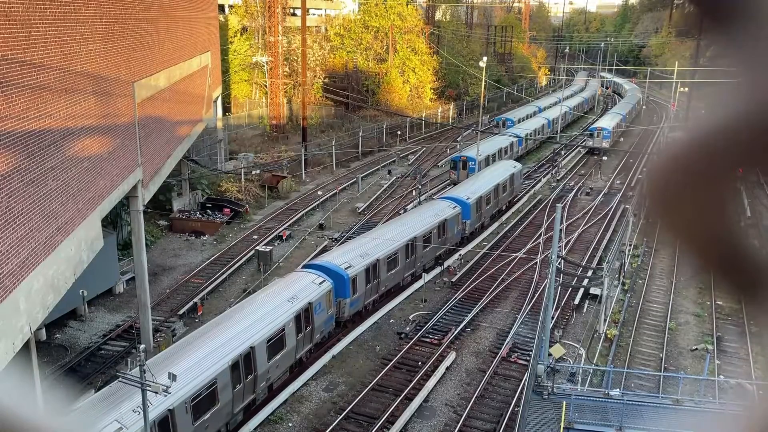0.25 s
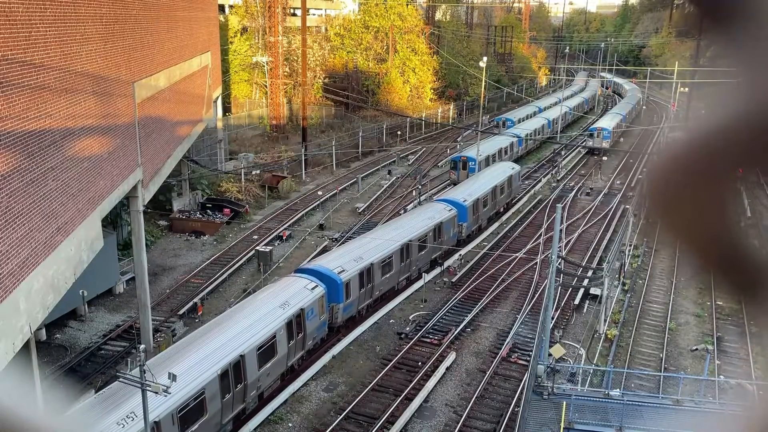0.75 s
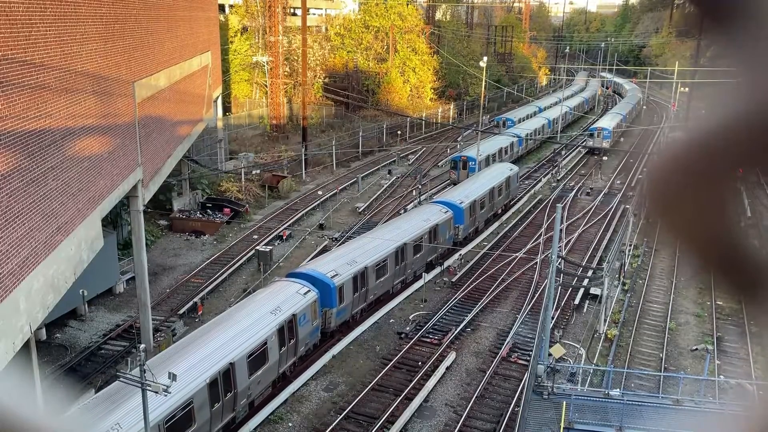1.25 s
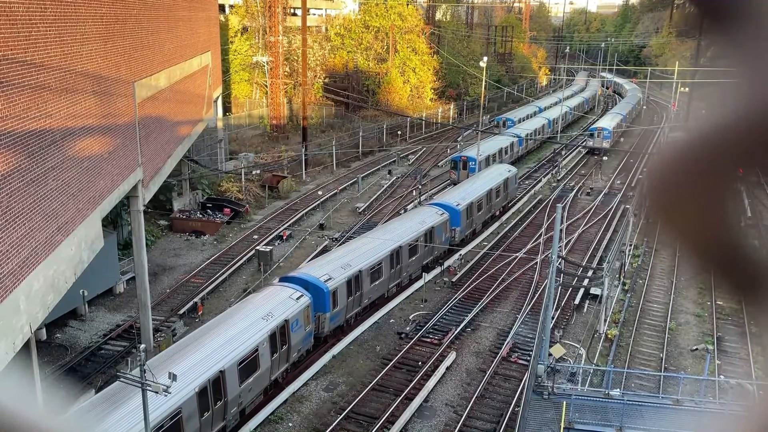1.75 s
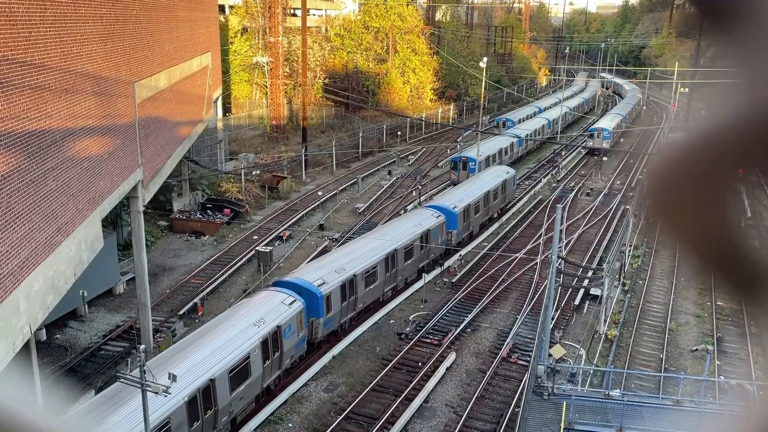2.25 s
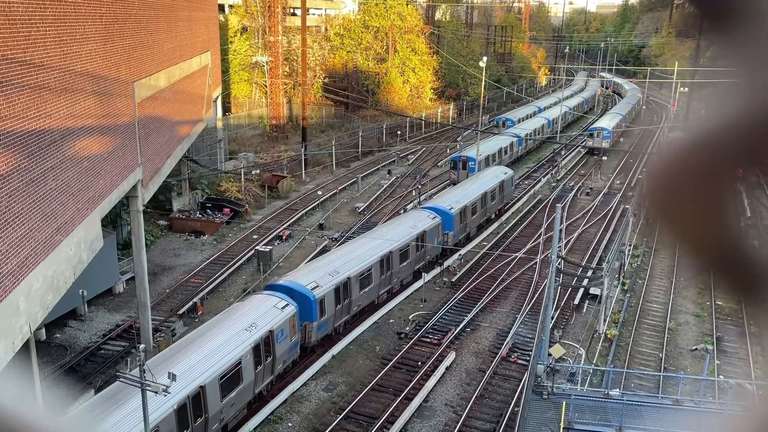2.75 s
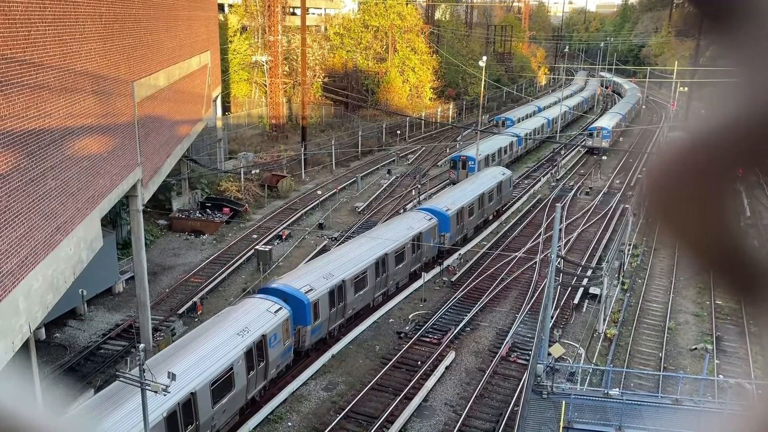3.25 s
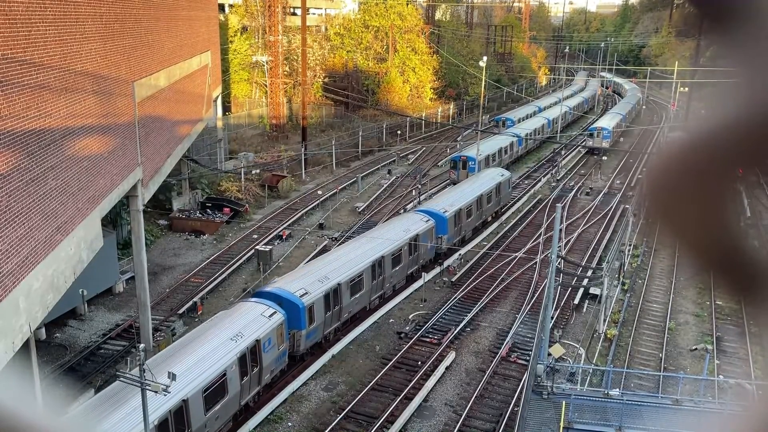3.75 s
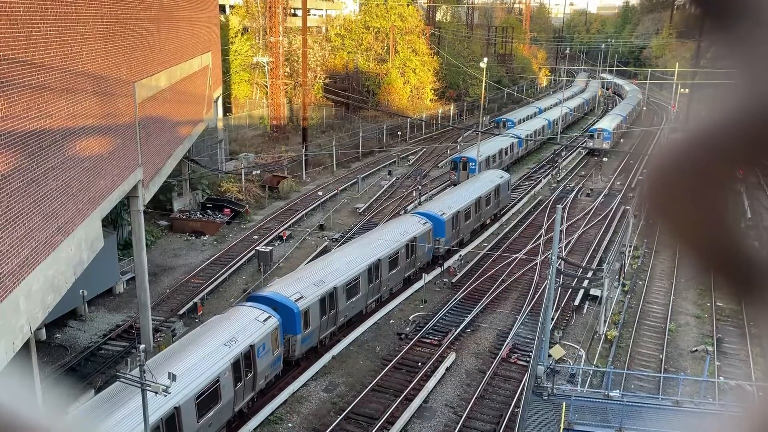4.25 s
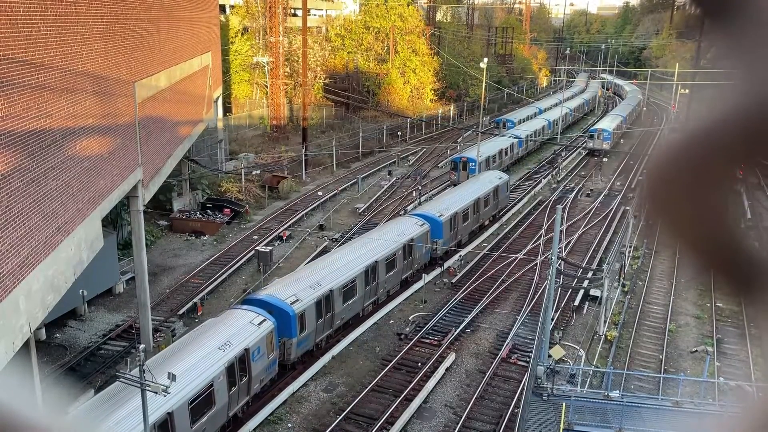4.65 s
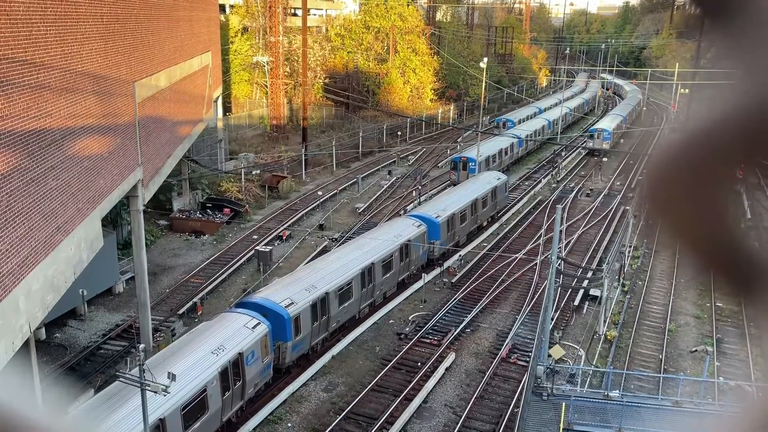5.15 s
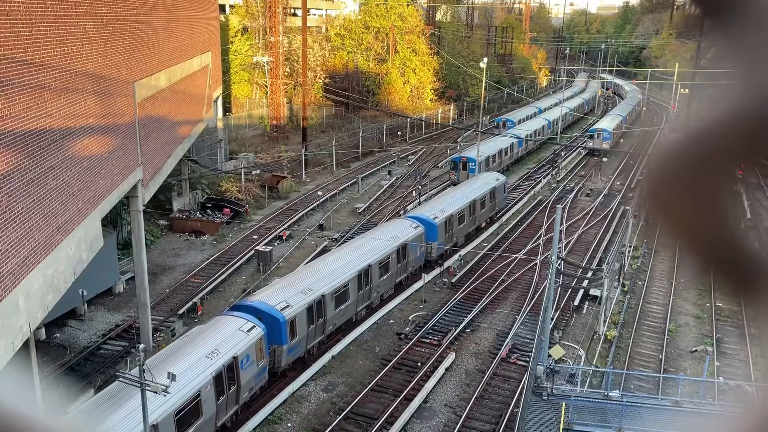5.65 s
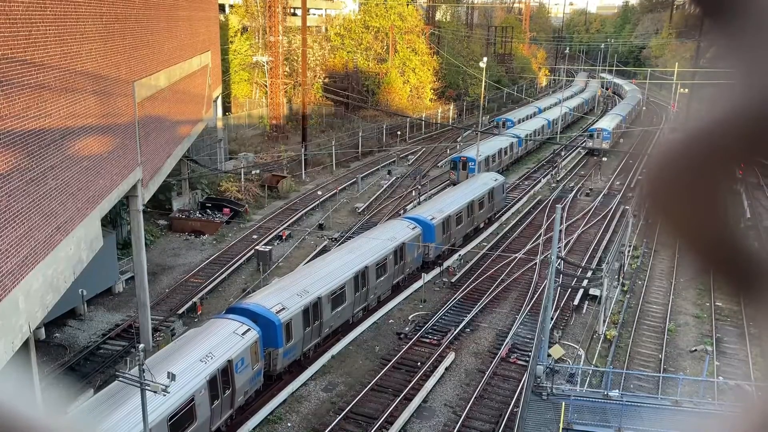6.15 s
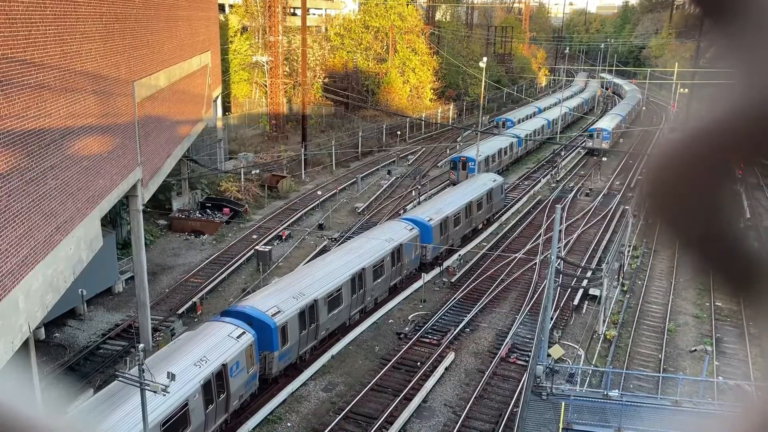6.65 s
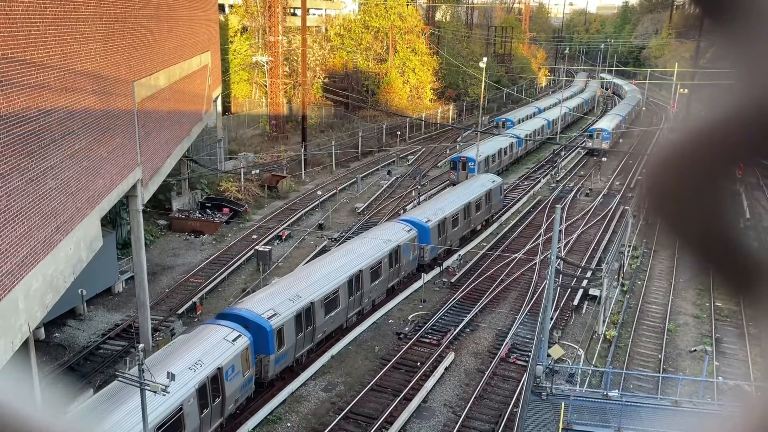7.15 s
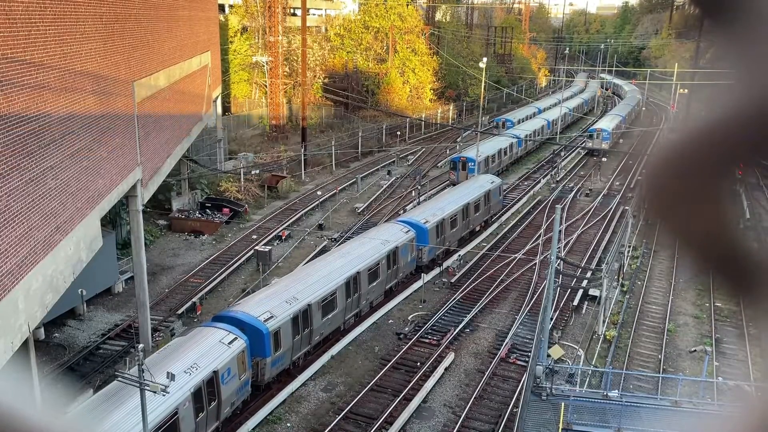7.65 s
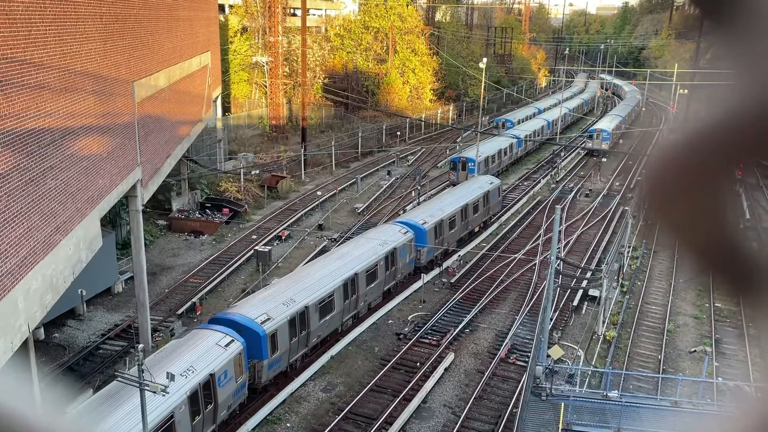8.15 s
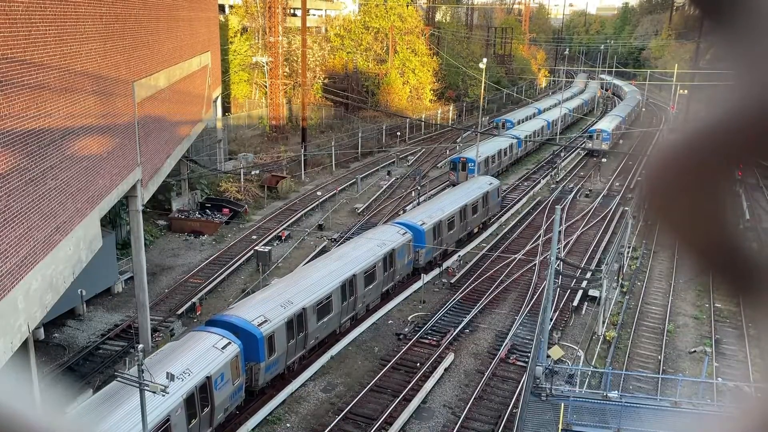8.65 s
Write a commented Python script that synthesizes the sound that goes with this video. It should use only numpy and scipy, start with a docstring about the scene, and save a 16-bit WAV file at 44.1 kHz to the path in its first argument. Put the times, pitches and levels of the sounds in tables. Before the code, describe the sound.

A long metro train creeps through an open rail yard, heard in wide stereo from a bridge above. From 0 to 0.6 s heavy low booms and lurches tumble together, with a hard dull thud near 0.65 s and a faint, very high squeal fading before 0.9 s. From 0.8 to 1.6 s lighter wheel thuds tick over gaps under hiss; a clear squeak chirps at about 1.6 s. Around 2 to 2.7 s there are sparse lurches and knocks while the hiss thins. From 3.2 to 4 s comes the second burst: clatter, low booms, a short frame drone, rougher rolling roar. After that, scattered soft low lurches until 6.2 s, over steady deep rumble and faint long ringing. From 6.2 s thin chirps multiply, brightest near 7.7 s, and hiss and rumble continue to the cut at about 8.9 s.

```python
"""Train creeping through a rail yard

A slow train is heard from a bridge above. The car bodies boom and lurch, shaped from deep noise and short low swings.
The bogies (wheel frames) clatter, drone and thud over switch gaps; the treads (running surfaces) roar dully.
The flanges (wheel lips) rub on the curve: noise hisses and grinds, narrow resonances ring, wavering sines squeal.
Two microphone ports hear bass and treble arrive from different sides.
"""
import sys
import numpy as np
from scipy import signal
from scipy.fft import rfft, irfft
from scipy.io import wavfile

SR = 44100
rng = np.random.default_rng(int(sys.argv[2]) if len(sys.argv) > 2 else 0)


def to_wav(sig):
    """Store sig (one row per channel, or 1-D mono) as 16-bit WAV at the path in sys.argv[1].

    Samples outside -1..1 are clipped; the rate is SR.
    """
    pcm = np.clip(np.atleast_2d(sig), -1, 1) * 32767
    pcm = np.round(pcm).astype(np.int16)
    wavfile.write(sys.argv[1], SR, pcm.T)  # frames by channels


N = 391608

# car bodies and bogies on the track: (time [s], rumble level [dB], clatter level [dB])
CAR_LEVELS = [(0.0, -18, -26.5), (0.2, -30, -27.5), (0.46, -17, -26), (0.6, -26, -30.5),
              (0.76, -35.5, -33.5), (1.3, -34, -31.5), (1.73, -38.5, -38), (1.83, -24.5, -42.5),
              (2.07, -27, -29), (2.35, -30.5, -35), (2.7, -28.5, -29.5), (3.07, -22.5, -36.5),
              (3.31, -25.5, -23.5), (3.7, -23.5, -25), (3.9, -22, -32), (4.3, -28, -34), (4.62, -28, -29),
              (5.2, -27.5, -34), (6.2, -26.5, -34), (7.0, -30, -32.5), (7.5, -30.5, -32.5),
              (8.2, -25.5, -34.5), (8.88, -29.5, -32)]
# deep rumble of the ground under the track: (time [s], level over the car rumble [dB])
GROUND_LEVELS = [(0, -17), (1, 0), (2, -5.5), (3.3, -13), (4, -3.5), (5.4, -2.5), (6.5, 1), (7.5, 0.5),
                 (8.88, -5)]
# treads rolling on the rail head: (time [s], lower roar level [dB])
ROLL_LEVELS = [(0.0, -37.5), (0.45, -35.5), (1.06, -33), (1.66, -31.5), (1.8, -35), (3.09, -35.5),
               (3.31, -28), (3.64, -27), (3.75, -31), (3.98, -34.5), (5.59, -34), (7.74, -32), (8.88, -32)]
# flanges rubbing on the rail side: (time [s], lower base level [dB], upper base level [dB])
RUB_LEVELS = [(0.0, -38, -47), (0.71, -39, -47.5), (0.89, -38.5, -54), (1.45, -38.5, -52), (1.6, -39, -48),
              (1.8, -43.5, -53), (1.9, -47.5, -58), (2.17, -51, -68.5), (2.5, -49.5, -61),
              (2.7, -45.5, -56), (3.04, -46.5, -57), (3.12, -37, -51.5), (3.31, -34.5, -49),
              (3.56, -37.5, -50.5), (3.81, -39.5, -47), (4.23, -43, -51.5), (5.02, -44, -52.5),
              (5.3, -41, -50), (6.1, -39.5, -46.5), (7.0, -39, -48), (7.5, -37.5, -45), (8.11, -38, -46.5),
              (8.25, -40.5, -54.5), (8.38, -40, -56.5), (8.43, -38, -50), (8.63, -37.5, -47),
              (8.88, -39.5, -46.5)]
# a flange bites harder for a moment: (time [s], extra rubbing [dB])
BITES = [(1.57, 3.5), (2.72, 5), (3.09, 1), (3.31, 1), (4.08, 1), (4.61, 4.5), (5.22, 4.5), (5.99, 1.5),
         (6.21, 4.5), (6.92, 4), (7.44, 0), (7.67, 1.5)]
# a car body lurches: (time [s], peak level [dB], pitch [Hz])
LURCHES = [ (0.041, -10.5, 80), (0.256, -12.5, 129), (0.27, -12, 94), (0.382, -9, 98), (0.423, -8.5, 139),
           (0.441, -9, 165), (0.464, -11, 119), (0.483, -8, 124), (0.508, -12, 75), (1.99, -13, 87),
           (2.164, -17.5, 100), (2.668, -15, 90), (3.226, -14, 85), (3.302, -20, 95), (3.382, -11, 109),
           (3.428, -12, 110), (3.452, -8, 116), (3.481, -12, 109), (3.547, -15, 90), (3.588, -16, 82),
           (3.617, -12.5, 80), (3.71, -10, 83), (3.741, -8.5, 85), (3.757, -10, 75), (3.867, -16, 73.4),
           (3.983, -13.5, 95), (4.022, -16.5, 66), (4.428, -13, 68.4), (5.176, -18, 77), (5.422, -14, 87.5),
           (5.728, -15, 75.4), (5.852, -14.5, 73), (5.984, -14.5, 83), (6.182, -17, 79)]
# wheels dropping into gaps: (time [s], blow level [dB], pitch [Hz])
THUDS = [(0.31, -16, 302), (0.419, -19, 322), (0.476, -19, 580), (0.503, -22.5, 424), (0.637, -10.5, 278),
         (0.818, -20.5, 330), (0.958, -21, 306), (1.108, -25, 1010), (1.144, -27, 447), (1.226, -21, 313),
         (1.398, -22, 333), (1.489, -25, 350), (1.976, -22, 358), (2.095, -20.5, 307), (2.153, -19.5, 340),
         (2.434, -23, 307), (2.656, -18, 475), (3.261, -20, 420), (3.414, -21, 412), (3.29, -25, 755),
         (3.513, -14, 348), (3.514, -20.5, 766), (3.643, -19, 930), (3.652, -18, 494)]
# a bogie frame drones: (time [s], length [s], level [dB])
DRONES = [(3.21, 0.56, -25.5), (4.422, 0.34, -26)]
# a flange grinds: (time [s], length [s], pitch [Hz], level [dB])
GRINDS = [(0.243, 0.16, 2500, -48), (0.497, 0.47, 4330, -47.5), (0.698, 0.45, 2370, -48),
          (3.2, 0.5, 2280, -53), (5.05, 0.36, 5200, -49), (6.517, 0.18, 620, -40)]
# chirps of single wheel modes, each sounding 1.22 lengths: (time [s], length [s], pitch [Hz], level [dB])
CHIRPS = [(0.17, 0.032, 4370, -39), (0.27, 0.092, 5580, -41.5), (0.44, 0.064, 3120, -46),
          (0.67, 0.17, 3520, -47), (0.92, 0.044, 4203, -42), (0.9, 0.67, 4240, -48), (1.25, 0.2, 4212, -40),
          (1.541, 0.067, 10600, -41), (1.579, 0.064, 4940, -35.5), (1.623, 0.088, 4920, -31),
          (1.708, 0.17, 4910, -45.5), (1.56, 0.82, 3460, -59), (1.86, 0.3, 5650, -59),
          (2.677, 0.041, 3475, -47), (3.084, 0.046, 3440, -49), (3.182, 0.04, 3500, -43),
          (3.208, 0.03, 3830, -38), (3.25, 0.06, 3850, -45), (3.36, 0.045, 3850, -45),
          (3.702, 0.24, 4430, -48.5), (3.82, 0.039, 4200, -44), (3.88, 0.03, 4330, -47),
          (4.052, 0.14, 3490, -49), (4.18, 0.32, 4480, -54), (4.576, 0.67, 3470, -55),
          (4.281, 0.035, 5460, -45), (4.597, 0.03, 5370, -47), (4.62, 0.086, 5663, -47),
          (4.747, 0.034, 5370, -45), (4.803, 0.93, 5680, -50.5), (4.88, 0.25, 4470, -51),
          (5.32, 1.7, 4443, -53), (5.194, 0.03, 4180, -42), (6.18, 0.03, 6880, -36),
          (6.459, 0.062, 4443, -45), (6.57, 0.06, 5800, -43), (6.185, 0.18, 12020, -43),
          (6.322, 0.037, 6970, -35), (6.38, 0.07, 6820, -36), (6.41, 0.083, 9194, -45),
          (6.94, 0.05, 9194, -44), (6.879, 0.35, 3900, -46), (7.2, 0.053, 6600, -39),
          (7.42, 0.06, 4920, -46), (7.168, 0.084, 4435, -41), (7.18, 0.18, 4780, -43),
          (7.363, 0.17, 5330, -44), (7.353, 0.07, 5640, -42), (7.433, 0.09, 6900, -41),
          (7.482, 0.11, 4450, -40), (7.485, 0.052, 5750, -37), (7.284, 0.06, 5600, -47),
          (7.619, 0.07, 5320, -40.5), (7.69, 0.06, 8000, -33), (7.707, 0.07, 6900, -32.5),
          (7.72, 0.06, 6340, -40), (7.636, 0.047, 4400, -39.5), (7.845, 0.095, 5590, -43),
          (7.99, 0.09, 5310, -56), (8.122, 0.04, 6374, -40), (8.342, 0.06, 3900, -48),
          (8.416, 0.055, 5310, -47), (8.472, 0.04, 4440, -47), (8.492, 0.13, 3920, -46),
          (8.59, 0.045, 6660, -42), (8.843, 0.04, 3420, -43), (8.522, 0.14, 3445, -44.5),
          (8.604, 0.09, 4420, -43), (8.737, 0.08, 4420, -40), (8.55, 0.08, 5310, -49),
          (8.778, 0.06, 5350, -40)]
# narrow ringing bands in the hiss, the top two of unknown source:
# (pitch [Hz], width [Hz], level against the rubbing [dB])
RINGING_BANDS = [(2920, 49, -20.5), (3465, 17, -21), (3900, 25, -25), (4450, 25, -20), (4900, 25, -22.5),
                 (5270, 36, -21), (5500, 30, -21), (5690, 16, -20), (6350, 18, -25), (6950, 65, -17),
                 (9170, 30, -13.5), (9948, 32, -20.5), (10163, 35, -22), (10520, 35, -18.5),
                 (11600, 29, -18.5), (12000, 37, -19), (13170, 58, -15.5), (14450, 80, -18),
                 (15500, 70, -16)]

# noise colours of car rumble, ground, clatter, roar and hiss: (frequency [Hz], relative level [dB])
RUMBLE_COLOUR = [(30, -26), (50, -17), (65, 0.5), (82, -0.5), (100, 1), (130, -7.5), (180, -23)]
DEEP_COLOUR = [(20, -28), (30, 1), (42, -6), (55, 17.5), (70, 7.5), (85, 6.5), (120, -38)]
CLATTER_COLOUR = [(80, -44), (130, 2.5), (200, -2.5), (300, -5), (450, -15.5), (700, -23.5), (1200, -48)]
ROAR_COLOUR = [(200, -17), (350, -3), (600, -3.5), (800, -4.5), (1100, -6), (1600, -5), (2100, -14),
               (3000, -16.5), (5000, -53), (9000, -62)]
HISS_COLOUR = [(1500, -6.5), (2300, 0.5), (3000, -4.5), (3700, -4), (5500, -2), (6200, -3.5), (8000, -1.5),
               (9500, -6), (11500, -4), (12700, -13), (15800, -7.5)]

# how far the left port runs ahead: (frequency [Hz], phase lead [radians])
PORT_LEAD = [(0, 0), (340, .4), (1210, 2.1), (1700, 3.3), (2100, 3.6), (2500, 6.4), (3100, 7.7),
             (3700, 6.2), (5900, 6.2), (7700, 3.5), (8700, 3.0), (11200, .1), (12600, -.4), (13900, -2.9),
             (15800, -3.3)]
# what both ports hear alike: (frequency [Hz], share [0 to 1])
PORT_ALIKE = [(40, 1), (200, 0.89), (500, 0.29), (1100, 0.77), (1900, 0.34), (2300, 0.16), (3800, 0.25),
              (6000, 0.47), (7300, 0.87), (8300, 1), (9600, 0.91), (11500, .99), (13300, 0.98),
              (14500, 0.98)]
# how much louder the left port is: (frequency [Hz], left over right [dB])
PORT_TILT = [(60, -0.5), (110, 0.5), (200, -0.5), (380, 0), (700, 2.5), (1290, -3.5), (2380, -1.7),
             (4400, 3), (8120, -0.3), (15000, 0.0)]

CUTOFF_HZ = 15900
QUARTER = np.array([[0], [1 / 4]])   # sets a tone's two copies a quarter turn apart
LUMPY_DB, LUMPS_PER_S = 0.5, 1.8     # the rumble swells and sinks by chance
LURCH_RISE_S, LURCH_FALL_S = 0.0061, 0.01
LURCH_CLATTER_DB = -15               # bogies clatter along, against the lurch's peak
JOLT_DB, JOLT_RISE_S, JOLT_FALL_S = -10, 0.011, 0.015   # clatter shaken up, against the thud's level
UPPER_ROAR_DB = -39
DRONE_HZ, DRONE_WIDTH_HZ = 196.3, 38            # width of each of two passes
GRIT_PER_S, GRIT_DB = 130, -10.5                # level against the clatter table
KNOCK_DB, KNOCK_HZ, KNOCK_S = -16, 750, 0.0015  # steel meets steel at the start of a thud
RATTLE_DB, RATTLE_S = -24.5, 0.012              # loose parts rattle after a thud
BITE_S = 0.016
TWITTER_DB, TWITTER_SPREAD_DB = -15, 7          # rings against the rubbing, and how much they differ
GRIND_WIDTH_HZ = 400                            # width of each of two passes
SQUEAL_HZ, SQUEAL_FROM_S, SQUEAL_TO_S, SQUEAL_EDGE_S = 13148, 0.11, 0.84, 0.058
SQUEAL_DB, SQUEAL_FADE_DB_PER_S = -32.5, 13.5   # level at time zero, and its steady fall
CHIRP_WAVER_HZ, CHIRP_STUTTER_DB, STUTTERS_PER_S = 11, 3.0, 30.0   # the slip grips and lets go


def from_db(db):
    """Turn decibels into gain."""
    return 10 ** (np.asarray(db) / 20)


def rms_one(x):
    """Scale a signal to an rms of one."""
    return x / np.sqrt(np.mean(x ** 2) + 1e-20)


def in_time(rows):
    """Draw each column of a time table as a curve over all samples."""
    s, *columns = np.transpose(rows)
    return [np.interp(np.arange(N) / SR, s, c) for c in columns]


def at_hz(points, hz):
    """Read a frequency table on a logarithmic axis."""
    table_hz, values = np.transpose(points)
    return np.interp(np.log(hz), np.log(table_hz), values)


def drift(rate):
    """Wander slowly by chance, with spread one: coarse noise smoothed twice at a rate in Hz."""
    r = np.exp(-80 * np.pi * rate / SR)   # one coarse step is 40 samples
    noise = rng.standard_normal(N // 40 + 2002)
    slow = signal.lfilter([1], [1, -2 * r, r * r], noise)[2000:]
    return np.interp(np.arange(N) / 40, np.arange(len(slow)), rms_one(slow))


def coloured(spectrum):
    """Make two unrelated noises of one colour, with an rms of one."""
    hz = np.arange(1, N // 2 + 2) * SR / N
    inside = (hz > spectrum[0][0] / 2) & (hz < spectrum[-1][0] * 2)
    white = rfft(rng.standard_normal((2, N)))
    return rms_one(irfft(white * from_db(at_hz(spectrum, hz)) * inside, N))


def resonance(x, hz, width_hz):
    """Ring at one pitch: a two-pole filter with gain one on top."""
    r = np.exp(-np.pi * width_hz / SR)
    feedback = [1, -2 * r * np.cos(2 * np.pi * hz / SR), r * r]
    return signal.lfilter(np.array([1, 0, -1]) * (1 - r * r) / 2, feedback, x)


def twice_resonant(x, hz, width_hz):
    """Pass a sound through the same resonance twice and scale it to an rms of one."""
    return rms_one(resonance(resonance(x, hz, width_hz), hz, width_hz))


def while_on(start, end, fade_s):
    """Give 1 between two times, fading in and out."""
    t = np.arange(N) / SR
    return np.clip(np.minimum(t - start, end - t) / fade_s, 0, 1)


def bell(t, rise_s, fall_s):
    """Swell to 1 at time zero and die away."""
    return np.exp(-(t / np.where(t < 0, rise_s, fall_s)) ** 2)


def surges(times, peaks_db, rise_s, fall_s):
    """Add up the power of brief swells."""
    t, power = np.arange(N) / SR, np.zeros(N)
    for s, peak_db in zip(times, peaks_db):
        near = slice(max(round((s - 4 * rise_s) * SR), 0), round((s + 4 * fall_s) * SR))
        power[near] += from_db(2 * peak_db) * bell(t[near] - s, rise_s, fall_s)
    return power


def rubbing():
    """Give the lower and upper rubbing levels in dB, with the flanges' brief bites on top."""
    t = np.arange(N) / SR
    bite_db = sum(db * np.exp(-((t - s) / BITE_S) ** 2) for s, db in BITES)
    return [level_db + bite_db for level_db in in_time(RUB_LEVELS)]


def follow_rubbing(hz, lower_db, upper_db):
    """Low pitches follow the lower rubbing; from 5 to 10 kHz the upper takes over."""
    up = np.clip(np.log2(hz / 5000), 0, 1)
    return (1 - up) * lower_db + up * upper_db


def rumble():
    """Car bodies and ground boom together: two deep noises swelling in step."""
    rumble_db, _ = in_time(CAR_LEVELS)
    ground_db, = in_time(GROUND_LEVELS)
    body = from_db(rumble_db + LUMPY_DB * drift(LUMPS_PER_S))
    return body * (coloured(RUMBLE_COLOUR) + from_db(ground_db) * coloured(DEEP_COLOUR))


def roar():
    """Treads roll on the rail: the dull part follows the roll levels, the upper part stays nearly even."""
    roar_db, = in_time(ROLL_LEVELS)
    tread = coloured(ROAR_COLOUR)
    dull = signal.sosfiltfilt(signal.butter(3, 1200, fs=SR, output="sos"), tread)
    lower = from_db(roar_db + 0.94 * drift(39.0)) * dull
    upper = from_db(UPPER_ROAR_DB) * (tread - dull)
    return from_db(1.06 * drift(3.0)) * (lower + upper)


def drone():
    """A bogie frame hums now and then: noise through a narrow resonance."""
    frame = twice_resonant(rng.standard_normal((2, N)), DRONE_HZ, DRONE_WIDTH_HZ)
    return sum(while_on(s, s + length, 0.13) * from_db(db) for s, length, db in DRONES) * frame


def clatter():
    """Bogies clatter in lumps: noise that lurches and thuds stir up."""
    _, clatter_db = in_time(CAR_LEVELS)
    lurch_s, lurch_db, _ = np.transpose(LURCHES)
    thud_s, thud_db, _ = np.transpose(THUDS)
    lurch = surges(lurch_s, lurch_db + LURCH_CLATTER_DB, LURCH_RISE_S, LURCH_FALL_S)
    jolt = surges(thud_s, thud_db + JOLT_DB, JOLT_RISE_S, JOLT_FALL_S)
    bogie = np.sqrt(from_db(2 * clatter_db) + lurch + jolt)   # powers add
    return bogie * from_db(1.23 * drift(21.6)) * coloured(CLATTER_COLOUR)


def grit():
    """Small chance knocks of the bogies: uneven clicks through a dull band, following the clatter."""
    _, clatter_db = in_time(CAR_LEVELS)
    clicks = (rng.random(N) < GRIT_PER_S / SR) * rng.standard_normal((2, N))
    band = signal.butter(2, [220, 800], "band", fs=SR, output="sos")
    return from_db(clatter_db + GRIT_DB) * rms_one(signal.sosfilt(band, clicks + 1e-18))


def lurches():
    """Each lurch swings the car body briefly at its own low pitch."""
    before = SR // 25
    out, t = np.zeros((2, N + SR)), np.arange(-before, SR // 15) / SR
    shape = bell(t, LURCH_RISE_S, LURCH_FALL_S)
    for (s, peak_db, hz), turn in zip(LURCHES, rng.random(len(LURCHES))):
        at = round(s * SR) + SR // 2 - before   # half a second of spare room in front
        swing = np.cos(2 * np.pi * (hz * t + turn + QUARTER))
        out[:, at:at + len(t)] += from_db(peak_db) * shape * swing
    return out[:, SR // 2:SR // 2 + N]


def thuds():
    """Each gap gives a knock, a swing at its own pitch that builds in a few ms and dies, and a little rattle."""
    out, t = np.zeros((2, N)), np.arange(SR // 8) / SR
    shape = 0.89 * t / 0.0031 * np.exp(1 - t / 0.003)
    knock = from_db(KNOCK_DB) * np.exp(-t / KNOCK_S) * np.sin(2 * np.pi * (KNOCK_HZ * t - QUARTER))
    shake = from_db(RATTLE_DB) * np.exp(-t / RATTLE_S)
    rattle_band = signal.butter(2, [200, 1100], "band", fs=SR, output="sos")
    for s, blow_db, hz in THUDS:
        swing = np.cos(2 * np.pi * (hz * (t - 0.0035) + QUARTER))
        rattle = rms_one(signal.sosfilt(rattle_band, rng.standard_normal((2, len(t)))))
        at = round(s * SR)
        out[:, at:at + len(t)] += from_db(blow_db) * (shape * swing + knock + shake * rattle)
    return out


def twitter():
    """Countless faint, brief rings of minor wheel modes at chance pitches, as loud as the rubbing drives them."""
    lower_db, upper_db = rubbing()
    out = np.zeros((2, N))
    for when, how_long, pitch, size, turn in rng.random((1300, 5)):
        hz = 2400 * 5 ** pitch   # 2.4 to 12 kHz
        count = round((0.03 + 0.07 * how_long) * SR)
        at = int(when * (N - count))
        level_db = follow_rubbing(hz, lower_db[at], upper_db[at] + 3.0)
        level_db += TWITTER_DB + TWITTER_SPREAD_DB * size ** 2
        ring = np.hanning(count) * np.sin(2 * np.pi * (hz * np.arange(count) / SR + turn + QUARTER))
        out[:, at:at + count] += from_db(level_db) * ring
    return out


def grinds():
    """A flange grinds: noise in a broad resonance, fluttering as it swells and fades."""
    scrape, flutter = rng.standard_normal((2, N)), from_db(2.4 * drift(18.0))
    out = np.zeros((2, N))
    for s, length, hz, db in GRINDS:
        band = twice_resonant(scrape, hz, GRIND_WIDTH_HZ)
        out += while_on(s, s + length, 0.064) * from_db(db) * band
    return flutter * out


def flanges():
    """Rubbing hisses, and narrow bands ring along with it, each with its own chance flicker."""
    lower_db, upper_db = rubbing()
    stick = 0.59 * drift(14.0) + 0.5 * drift(15.0)   # the grip changes for all pitches together
    hiss, scrape = coloured(HISS_COLOUR), rng.standard_normal((2, N))
    low = signal.sosfilt(signal.butter(3, 7000, fs=SR, output="sos"), hiss)
    high_db = upper_db + 7 + 1.87 * stick + 0.56 * drift(30.0) + 1.46 * drift(6.0)
    out = from_db(lower_db + 1 + stick) * low + from_db(high_db) * (hiss - low)
    for hz, width_hz, level_db in RINGING_BANDS:
        effort_db = follow_rubbing(hz, lower_db, upper_db + 6.0) + stick
        ring = rms_one(resonance(scrape, hz, width_hz))
        out = out + from_db(effort_db + level_db + 3.64 * drift(12.7)) * ring
    return out


def high_squeal():
    """A slipping wheel locks onto one high mode: a wavering sine that fades."""
    turns = np.cumsum(SQUEAL_HZ + 8.3 * drift(14.0)) / SR + QUARTER
    level_db = SQUEAL_DB - SQUEAL_FADE_DB_PER_S * np.arange(N) / SR + 4.1 * drift(27.0)
    on = while_on(SQUEAL_FROM_S, SQUEAL_TO_S, SQUEAL_EDGE_S)
    return on * from_db(level_db) * np.sin(2 * np.pi * turns)


def chirps():
    """Slipping wheels lock onto single modes for a moment or up to about two seconds: sines waver and stutter."""
    out = np.zeros((2, N))
    waver, flutter = CHIRP_WAVER_HZ * drift(40.0), CHIRP_STUTTER_DB * drift(STUTTERS_PER_S)
    for (s, length, hz, peak_db), (turn, shift) in zip(CHIRPS, rng.random((len(CHIRPS), 2))):
        span = slice(round(s * SR), min(round((s + 1.22 * length) * SR), N))
        # quick rise, slower fade
        swell = np.sin(np.pi * np.linspace(0, 1, span.stop - span.start) ** 0.76)
        # each chirp reads the wavering from its own place
        own = (np.arange(span.start, span.stop) + int(shift * N)) % N
        turns = np.cumsum(hz + waver[own]) / SR + QUARTER + turn
        out[:, span] += from_db(peak_db + flutter[own]) * swell * np.sin(2 * np.pi * turns)
    return out


def ports(pair):
    """The right port hears part of the left's sound, shifted in phase, and for the rest unrelated sound."""
    hz = np.arange(1, N // 2 + 2) * SR / N
    first, second = rfft(pair)
    alike = np.clip(at_hz(PORT_ALIKE, hz), 0, 1)
    tilt = from_db(at_hz(PORT_TILT, hz) / 2)   # half for each port
    lead = np.interp(hz, *np.transpose(PORT_LEAD))
    right = (alike * first + np.sqrt(1 - alike ** 2) * second) * np.exp(-1j * lead)
    return irfft([first * tilt, right / tilt], N)


def scene():
    """All sources together reach the two ports."""
    cars = rumble() + roar() + drone() + clatter() + grit() + lurches() + thuds()
    curve = twitter() + grinds() + flanges() + high_squeal() + chirps()
    return ports(cars + curve)


def record(dry):
    """Cut the top of the treble steeply."""
    return signal.sosfilt(signal.cheby2(30, 70, CUTOFF_HZ, fs=SR, output="sos"), dry)


dry = scene()
out = record(dry)
to_wav(out)
```